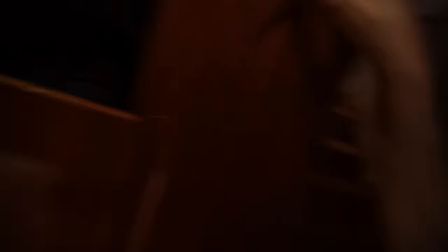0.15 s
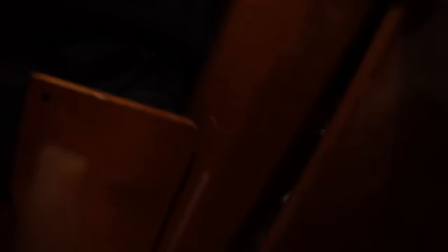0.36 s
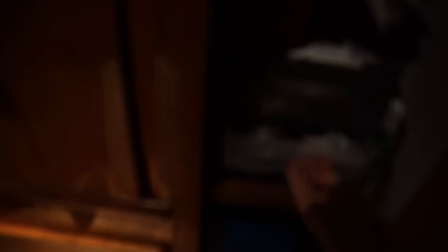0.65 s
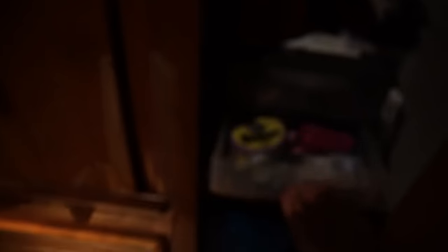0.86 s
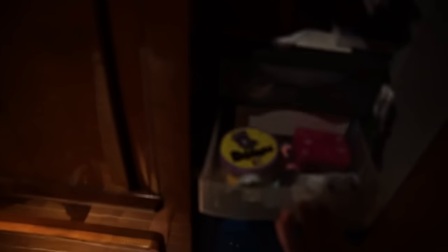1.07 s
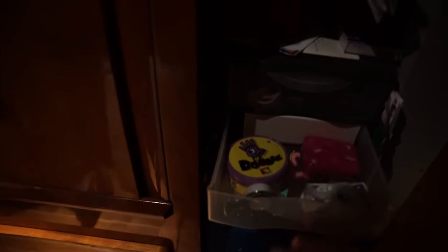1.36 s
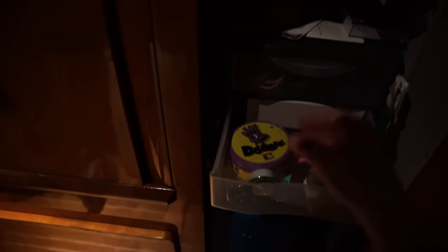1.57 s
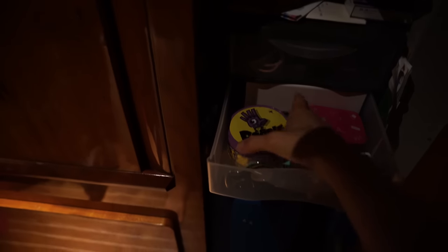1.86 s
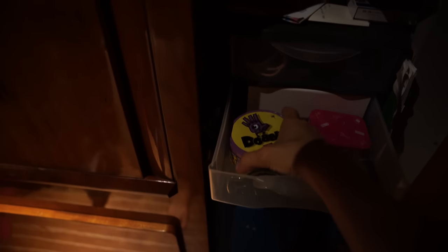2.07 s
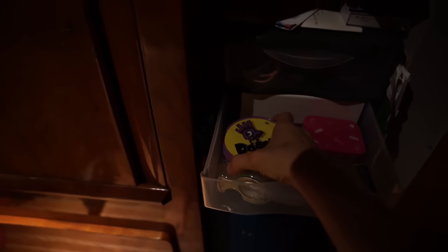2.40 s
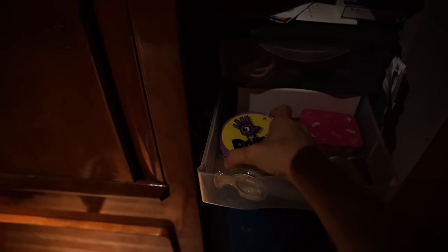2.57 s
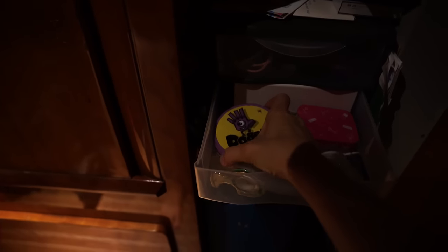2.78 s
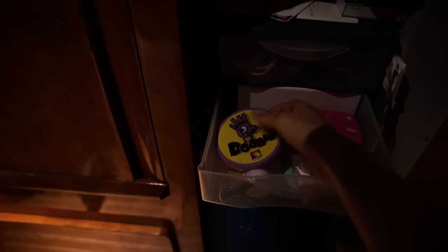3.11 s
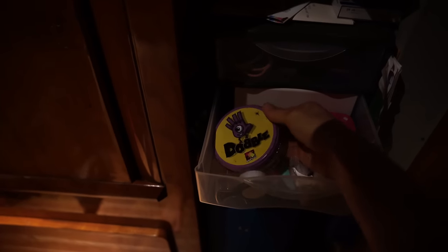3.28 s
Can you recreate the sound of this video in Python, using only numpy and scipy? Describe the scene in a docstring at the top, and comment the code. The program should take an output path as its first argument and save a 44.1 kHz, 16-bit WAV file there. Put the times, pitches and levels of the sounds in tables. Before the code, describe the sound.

A hand rummages in a plastic drawer: a wooden door bumps open, the drawer scrapes out, a tin is knocked, small things click, then one hard clack. Close microphone in a small wooden boat cabin.

```python
"""A hand rummages in a plastic drawer: things click, rub and rattle, a round tin is knocked, and one
hard clack comes near the end. First a locker door bumps open and the drawer slides out, in a small wooden
boat cabin with a low hum and a faint high whine. Blows are noisy pushes shaped by each body's resonances;
rubs and the slide's body are noise in uneven catches, squeaks are wavering tones, the tin adds ringing sines."""
import sys
import numpy as np
from scipy import signal
from scipy.fft import rfft, irfft, next_fast_len
from scipy.io import wavfile
from scipy.ndimage import uniform_filter1d, map_coordinates

SR = 44100
rng = np.random.default_rng(int(sys.argv[2]) if len(sys.argv) > 2 else 0)


def file_out(sig):
    """Save sig as 16-bit WAV at sys.argv[1]."""
    # one column per channel
    cols = np.atleast_2d(sig).T
    # limit, then scale
    lim = np.clip(cols, -1, 1)
    pcm = np.round(lim * 32767).astype(np.int16)
    wavfile.write(sys.argv[1], SR, pcm)


N = 152145  # scene length [samples]

# All band and colour levels are set before the tilt, resonances and bass roll-off that colour() adds.
# steady air with a whine: (frequency [Hz], level [dB])
AIR_COLOUR = [(20, -64.5), (45, -59.5), (90, -63.5), (200, -65.5), (330, -72), (520, -68), (1000, -74.5),
              (2500, -77.5), (6000, -78), (15000, -74.5)]
# peaks in the air, the whine among them: (frequency [Hz], width [Hz], boost [dB])
AIR_PEAKS = [(192, 58, 8.5), (6570, 280, 14.5), (12200, 450, 8)]
# low hum: (frequency [Hz], rms level [dB])
HUM = [(38, -60), (77, -62.5)]
# decay of the cabin: (frequency [Hz], time to fall 60 dB [s])
CABIN_DECAY = [(100, 0.68), (1000, 0.16), (5000, 0.18), (15000, 0.13)]
# the door's edge striking: (time [s], level added to the colour [dB])
DOOR_KNOCKS = [(0.1239, -28.5), (0.1304, -35)]
# door tone: (frequency [Hz], level [dB])
DOOR_COLOUR = [(300, -12), (1050, -1), (1500, -8), (4000, -14), (15000, -40)]
# door resonances: (frequency [Hz], width [Hz], boost [dB])
DOOR_MODES = [(690, 52, 8), (1030, 97, 9.5)]
# wooden bumps: (time [s], low, middle and high band levels [dB], time for the chatter to fall 60 dB [s])
BUMPS = [(0.132, -28.5, -29.5, -54, 0.051), (0.175, -31, -35, -48, 0.11),
         (.194, -21.5, -35.5, -32.5, 0.069), (0.218, -29, -31.5, -52, 0.052),
         (0.246, -29, -27.5, -48, 0.04), (0.366, -35.5, -25.5, -57, 0.029), (0.384, -25, -35.5, -66, 0.024),
         (0.467, -30.5, -42.5, -44.5, 0.18), (0.5753, -31.5, -18, -63, 0.04),
         (.586, -37.5, -21.5, -43, 0.044), (1.387, -39.5, -38, -47, 0.16), (1.975, -44, -45, -49, 0.039),
         (2.1204, -59, -31.5, -68, 0.034), (2.275, -38, -51.5, -53.5, 0.089), (2.301, -37, -41, -44, 0.14),
         (2.878, -34.5, -61, -58, 0.13)]
# centres of the three bump bands: (frequency [Hz])
BUMP_BANDS_HZ = [110, 300, 850]
# bump treble: (frequency [Hz], level relative to the high bump band [dB])
BUMP_TREBLE = [(2500, -18), (8000, -17.5), (15000, -36)]
# locker wood resonances: (frequency [Hz], width [Hz], boost [dB])
WOOD_MODES = [(137.5, 57, 5.5), (234.5, 26, 3.5), (327, 24.5, 6)]
# the drawer sliding out: (time [s], rms level of its body [dB], rms level of the runners' hiss [dB])
SLIDE = [(0.558, -54, -66), (0.579, -30.5, -47), (.62, -37.5, -47), (.652, -35, -43.5), (.68, -46, -47),
         (.725, -53.5, -52), (.83, -49.5, -57), (.93, -53.5, -54.5), (1.03, -51.5, -59.5),
         (1.12, -52, -60.5), (1.181, -64, -82)]
# relative tone of the sliding body: (frequency [Hz], level [dB])
SLIDE_BODY = [(80, 16.5), (280, 5.5), (550, 6), (750, 6), (1150, 11.5), (2200, 6), (4000, -9)]
# relative tone of the runners' hiss: (frequency [Hz], level [dB])
SLIDE_HISS = [(1000, -30), (2300, 0.5), (4500, 3.5), (9000, -1), (15000, -7)]
# plastic drawer resonances: (frequency [Hz], width [Hz], boost [dB])
DRAWER_MODES = [(315, 45, 6), (490, 35, 6), (865, 40, 5), (1095, 90, 6), (2157, 600, 4), (3480, 250, 6),
                (8000, 900, 2)]
# stick-slip tones: (middle [s], time to fade to 1/e either side [s], middle pitch [Hz], waver [Hz], peak [dB])
SQUEAKS = [(0.045, 0.046, 139, 10, -30.5), (0.76, 0.045, 4580, 450, -51.5), (2.949, 0.0048, 1430, 130, -31),
           (3.39, 0.0023, 1900, 110, -39)]
# knocks on the tin: (time [s], level [dB], brightness [dB per octave])
TIN_KNOCKS = [(1.402, -28.5, 1.5), (1.544, -27.5, 1.5), (1.636, -33, -3), (2.059, -39.5, -3)]
# the tap on the tin: (frequency [Hz], level [dB])
TIN_COLOUR = [(150, -17.5), (550, -14.5), (1150, -18), (2600, -15), (4500, -34), (9000, -39), (15000, -65)]
# the tin's ringing notes: (frequency [Hz], level [dB], time to fall 60 dB [s])
TIN_MODES = [(489, 6.5, 0.04), (1068, -1, 0.032), (4000, -11, 0.036)]
# spells of tiny ticks: (start [s], end [s], level before the 12 to 18 dB drop in rattles() [dB])
RATTLES = [(0.235, 0.341, -60), (2.895, 3.076, -60)]
# tone of a tick: (frequency [Hz], level [dB])
TICK_COLOUR = [(1000, -16), (3500, 7), (9000, 19), (15000, -2)]
# things rubbing: (start [s], length [s], levels in the four click bands, low to high [dB])
RUBS = [(0, 0.17, -43, -59.5, -65, -70), (0.154, 0.35, -52.5, -57, -60, -65.5),
        (1.34, 0.12, -47, -48, -58.5, -64), (1.933, 0.25, -61, -65.5, -67.5, -66.5),
        (2.092, .17, -54, -56.5, -67.5, -69), (2.261, 0.094, -44.5, -51, -62.5, -70),
        (2.533, .11, -50.5, -50.5, -69, -67.5), (2.78, 0.4, -56, -53.5, -62.5, -64),
        (2.917, 0.16, -42.5, -48.5, -50.5, -64), (3.215, 0.25, -55, -62.5, -64, -65)]
# hard clack and its rebounds: (time [s], level added to the colour [dB])
CLACKS = [(3.1623, -18), (3.168, -23.5), (3.184, -36)]
# tone of the clack: (frequency [Hz], level [dB])
CLACK_COLOUR = [(150, -30.5), (480, -12), (900, -7.5), (1450, -0.5), (2300, -9.5), (3400, -8), (8000, -11),
                (15000, -15)]
# resonances of the clack: (frequency [Hz], width [Hz], boost [dB])
CLACK_MODES = [(484, 60, 9), (872, 40, 5), (1220, 70, 6), (1395, 70, 7), (1600, 70, 6), (1810, 80, 9),
               (3220, 220, 9), (5000, 110, 7), (7430, 450, 8)]
# plastic contacts: (time [s], four band levels, low to high [dB], time for the chatter to fall 60 dB [s])
CLICKS = [(0.26, -60, -43.5, -53, -52.5, 0.051), (.352, -47, -45, -41.5, -65, 0.056),
          (.429, -69, -41, -36.5, -56, 0.062), (0.574, -52, -50, -38, -47.5, 0.23),
          (.65, -28.5, -35.5, -39, -68, 0.039), (0.688, -44, -38.5, -34.5, -43, 0.054),
          (0.747, -47, -41.5, -59, -82, 0.056), (0.7814, -43.5, -40.5, -49.5, -58.5, 0.079),
          (.812, -40.5, -39.5, -49.5, -61, 0.078), (1.052, -41.5, -45, -51.5, -90, 0.069),
          (1.123, -52, -43, -58, -92, 0.037), (1.349, -76, -42.5, -48.5, -54.5, 0.021),
          (1.369, -40, -40.5, -49, -55.5, 0.055), (1.423, -71, -47, -51, -57, 0.018),
          (1.482, -53, -50, -61.5, -65, 0.066), (1.955, -62, -50.5, -57.5, -73, 0.049),
          (1.991, -43, -48.5, -59.5, -65, 0.093), (2.121, -43, -40.5, -56, -62, 0.029),
          (2.3025, -46, -43.5, -47.5, -77, 0.028), (2.6521, -36.5, -43, -58.5, -85, 0.078),
          (2.694, -45.5, -34, -51, -63, 0.029), (2.8043, -54, -55, -51, -40.5, 0.033),
          (2.854, -35.5, -43, -52.5, -74, 0.053), (2.9396, -37, -39, -47, -71, 0.061),
          (3, -35, -33.5, -37.5, -39, 0.1), (3.012, -37, -31.5, -36.5, -42, 0.053),
          (3.048, -37, -48, -48, -57, 0.042), (3.075, -41, -43.5, -59, -74, 0.027),
          (3.1055, -34.5, -46, -47, -49, 0.063), (3.138, -34, -32.5, -50, -54, 0.28),
          (3.1513, -35, -36, -38, -39, 0.031), (3.249, -41.5, -43.5, -62, -74, 0.14),
          (3.303, -58, -51, -44, -61, 0.051), (3.337, -67, -44.5, -55, -58.5, 0.026)]
# centres of the four click bands: (frequency [Hz])
CLICK_BANDS_HZ = [450, 1200, 3200, 9000]

CABIN_DB = -17  # level of the room's tail
TOP_HZ = 15800  # nothing sounds above this
SIZE = 16384  # length of one blow [samples]
BLOW_S = 0.008  # time that sets the strength of every blow
EVEN_BELOW_HZ = 1800  # below this a blow's random spectrum is evened out band by band
BEND_S = 0.000909  # travel time of a 1 kHz bending wave; the bass arrives later than the treble
RUB_RISE = 0.46  # share of a stroke spent rising
RUB_SPLIT_HZ = 2500  # dull catches below, bright ones above
RUB_CATCHES_PER_S, RUB_SPREAD_DB = 110, 14
SLIDE_CATCHES_PER_S, SLIDE_SPREAD_DB = 220, 10
CATCH_SHARE = 0.5  # time for a catch's power to fall to 1/e, as a share of the mean gap
SQUEAK_SAG = 0.0804  # a tone sags from this share above its middle pitch towards as much below
TICKS_PER_S, TICK_SPREAD_DB = 70, 3  # spread is either side of the mean


def amp(db):
    """Decibels to gain."""
    return 10 ** (np.asarray(db) / 20)


def unit(x):
    """Scale to rms 1."""
    return x / np.sqrt(np.mean(x ** 2) + 1e-20)


def along(points, hz):
    """Read a curve of (frequency, value) points on a log frequency axis."""
    f, v = np.transpose(points)
    return np.interp(np.log(hz + 1), np.log(f + 1), v)


def wobble(rate):
    """A smooth random curve through rate knots a second."""
    knots = rng.standard_normal(int(N * rate / SR) + 4)
    return map_coordinates(knots, [np.arange(N) * rate / SR])


def filtered(x, response):
    """Shape a sound by a response given as a function of frequency."""
    size = next_fast_len(N + SIZE)
    return irfft(rfft(x, size) * response(np.fft.rfftfreq(size, 1 / SR)), size)[:N]


def colour(points, modes, low_hz):
    """Response of a body: band levels and resonance peaks, tilted down 3 dB an octave, with a bass roll-off."""
    def response(f):
        peaks = sum(db / (1 + (2 * (f - hz) / width) ** 2) for hz, width, db in modes)
        tilt = np.sqrt(SR / 2 / (f + 1))
        roll_off = f ** 2 / (f ** 2 + low_hz ** 2)
        return amp(along(points, f) + peaks) * tilt * roll_off
    return response


def add(out, start, x):
    """Mix x into out at a start time in seconds."""
    part = out[max(round(start * SR), 0):][:len(x)]
    part += x[:len(part)]


def blow(response, t60, direct_db):
    """A sharp push and dying chatter, rung through a causal body and spread in time by bending waves."""
    t, f = np.arange(SIZE) / SR, np.fft.rfftfreq(SIZE, 1 / SR)
    chatter = rng.standard_normal(SIZE) * amp(-60 * t / t60)
    force = chatter / np.linalg.norm(chatter)
    force[0] += amp(direct_db)  # the push, against chatter of energy 1
    force = rfft(force)
    # even out the colour of this random force
    power = np.abs(force) ** 2
    ripple = np.where(f < EVEN_BELOW_HZ, uniform_filter1d(power, size=64), power.mean())
    # fold the cepstrum forward so that the body answers only after the push (minimum phase)
    cepstrum = irfft(np.log(np.maximum(response(f) / np.sqrt(ripple), 1e-6)))
    cepstrum[1:SIZE // 2] *= 2
    cepstrum[SIZE // 2 + 1:] = 0
    lag = 4 * np.pi * BEND_S * np.sqrt(1000 * f)  # phase [rad]
    sound = irfft(force * np.exp(rfft(cepstrum) - 1j * lag))
    fade = np.cos(np.pi / 2 * t / t[-1])
    return sound * fade * np.sqrt(BLOW_S * SR)


def friction(rate, spread_db):
    """Noise of rms 1 in uneven catches, rate a second, each starting at once and then dying away."""
    count = round(rate * N / SR)
    when, size = rng.random((2, count))
    places = ((np.arange(count) + when) * N / count).astype(int)
    slips = np.bincount(places, amp(spread_db * size) ** 2, N)
    power = signal.lfilter([1], [1, -np.exp(-rate / SR / CATCH_SHARE)], slips)
    return unit(rng.standard_normal(N) * np.sqrt(power))


def plastic_colour(levels, top_db=-7):
    """The drawer's resonances over one contact's band levels; each spot favours different ones."""
    modes = [(hz, width, db * rng.uniform(0.5, 1.5)) for hz, width, db in DRAWER_MODES]
    points = [*zip(CLICK_BANDS_HZ, levels), (TOP_HZ, levels[-1] + top_db)]
    return colour(points, modes, low_hz=295)


def background():
    """Low hum of phase-wandering sines, and noise shaped into quiet air and a narrow whine."""
    t = np.arange(N) / SR
    hum = np.zeros(N)
    for hz, db in HUM:
        hum += amp(db) * np.sqrt(2) * np.sin(2 * np.pi * hz * t + 1.57 * wobble(2.3))
    return hum + filtered(rng.standard_normal(N), colour(AIR_COLOUR, AIR_PEAKS, low_hz=5))


def cabin(x):
    """The tail of the small wooden room: noise that swells quickly and dies at its own pace in each band."""
    hz, t, grid = signal.stft(rng.standard_normal(SR // 2), SR, nperseg=256)
    decay = amp(-60 * t / along(CABIN_DECAY, hz)[:, None])
    tail = signal.istft(grid * decay, SR, nperseg=256)[1]
    tail *= 1 - np.exp(-np.arange(len(tail)) / SR / 0.0058)
    return signal.fftconvolve(x, tail / np.linalg.norm(tail))[:N]


def door():
    """The edge of the locker door strikes with a crisp wooden tock and rebounds."""
    out = np.zeros(N)
    for start, db in DOOR_KNOCKS:
        tock = blow(colour(DOOR_COLOUR, DOOR_MODES, low_hz=300), t60=0.022, direct_db=-5)
        add(out, start, amp(db) * tock)
    return out


def bumps():
    """Dull blows set off the low resonances of the locker's woodwork."""
    out = np.zeros(N)
    for start, *levels, t60 in BUMPS:
        treble = [(hz, levels[-1] + db) for hz, db in BUMP_TREBLE]
        wood = colour([*zip(BUMP_BANDS_HZ, levels), *treble], WOOD_MODES, low_hz=74.5)
        add(out, start, blow(wood, t60, direct_db=-4))
    return out


def slide():
    """The drawer jerks free in coarse catches, then glides on its hissing runners."""
    times, body_db, hiss_db = np.transpose(SLIDE)
    t = np.arange(N) / SR
    catches = friction(SLIDE_CATCHES_PER_S, SLIDE_SPREAD_DB)
    body = unit(filtered(catches, colour(SLIDE_BODY, DRAWER_MODES, low_hz=93)))
    grain = rng.standard_normal(N) * amp(1.1 * wobble(400))
    hiss = unit(filtered(grain, colour(SLIDE_HISS, DRAWER_MODES, low_hz=900)))
    # silent before the first point and after the last
    body_gain = amp(np.interp(t, times, body_db, -np.inf, -np.inf))
    hiss_gain = amp(np.interp(t, times, hiss_db, -np.inf, -np.inf))
    return body * body_gain + hiss * hiss_gain


def squeaks():
    """Surfaces stick and slip into brief wavering, sagging tones: the door groans low, runners and plastic squeak."""
    out, t = np.zeros(N), np.arange(N) / SR
    for middle, length, hz, waver_hz, db in SQUEAKS:
        place = (t - middle) / length
        pitch = hz * (1 - SQUEAK_SAG * np.tanh(place)) + waver_hz * wobble(2 * waver_hz)
        phase = 2 * np.pi * np.cumsum(pitch) / SR
        out += amp(db) * np.sin(phase) * np.exp(-place ** 2)
    return out


def tin():
    """The round tin answers each knock with a tap and a short hollow note of decaying sines."""
    out, t = np.zeros(N), np.arange(SIZE) / SR
    for start, db, bright in TIN_KNOCKS:
        def tilt(hz):
            """Brightness of this knock, pivoting on the lowest note."""
            return bright * np.log2(hz / TIN_MODES[0][0])
        points = [(hz, level + tilt(hz)) for hz, level in TIN_COLOUR]
        tap = blow(colour(points, [], low_hz=122), t60=0.035, direct_db=-12)
        ring = np.zeros(SIZE)
        for hz, level, t60 in TIN_MODES:
            ring += amp(level + tilt(hz) - 60 * t / t60) * np.sin(2 * np.pi * hz * t)
        soft_start = 1 - np.exp(-t / 0.0043)
        add(out, start, amp(db) * (tap + ring * soft_start))
    return out


def rattles():
    """Loose small things tick at random, each ringing at its own pitch."""
    out = np.zeros(N)
    for start, end, db in RATTLES:
        count = round((end - start) * TICKS_PER_S)
        for k, (when, size, pitch) in enumerate(rng.random((count, 3))):
            ping = [(2500 * 4 ** pitch, 900, 8)]  # 2.5 to 10 kHz
            tick = blow(colour(TICK_COLOUR, ping, low_hz=700), t60=0.036, direct_db=-13)
            tick_db = db + TICK_SPREAD_DB * 2 * (size - 3.0)  # 12 to 18 dB down
            add(out, start + (k + when) / TICKS_PER_S, amp(tick_db) * tick)
    return out


def rubs():
    """Strokes of friction made of many tiny catches; dull and bright ones come separately."""
    out, t = np.zeros(N), np.arange(N) / SR
    for start, length, *levels in RUBS:
        stroke = np.sqrt(np.interp((t - start) / length, [0, RUB_RISE, 1], [0, 1, 0]))
        body = plastic_colour(levels)
        for kind in ("lowpass", "highpass"):
            split = signal.butter(2, RUB_SPLIT_HZ, kind, fs=SR, output="sos")
            catches = signal.sosfilt(split, friction(RUB_CATCHES_PER_S, RUB_SPREAD_DB))
            out += filtered(catches * stroke, body)
    return out


def clack():
    """One thing slips and falls hard against the drawer, rebounding with weaker blows."""
    out = np.zeros(N)
    for start, db in CLACKS:
        hit = blow(colour(CLACK_COLOUR, CLACK_MODES, low_hz=153.7), t60=0.03, direct_db=-8.0)
        add(out, start, amp(db) * hit)
    return out


def clicks():
    """Plastic things tap each other and the drawer, exciting its resonances."""
    out = np.zeros(N)
    for start, *levels, t60 in CLICKS:
        add(out, start, blow(plastic_colour(levels), t60, direct_db=-14.5))
    return out


def scene():
    """All the handling, in the cabin, over the background."""
    handling = door() + bumps() + slide() + squeaks() + tin() + rattles() + rubs() + clack() + clicks()
    return (handling + amp(CABIN_DB) * cabin(handling) + background())[None]


def record(dry):
    """Cut everything from the band limit up."""
    return filtered(dry[0], lambda hz: hz < TOP_HZ)[None]


dry = scene()
out = record(dry)
file_out(out)
```